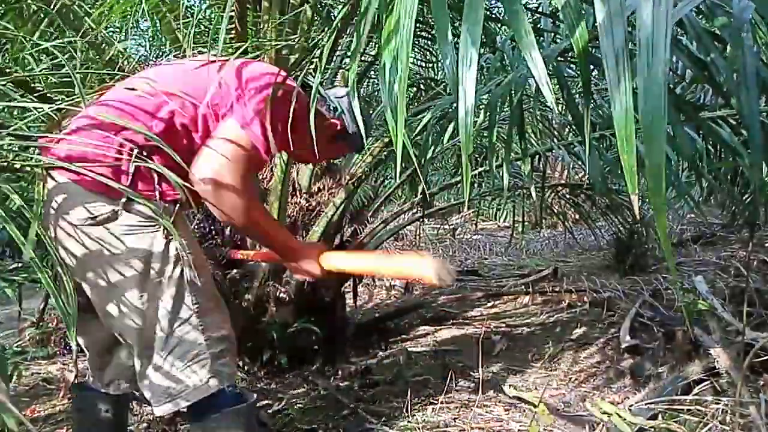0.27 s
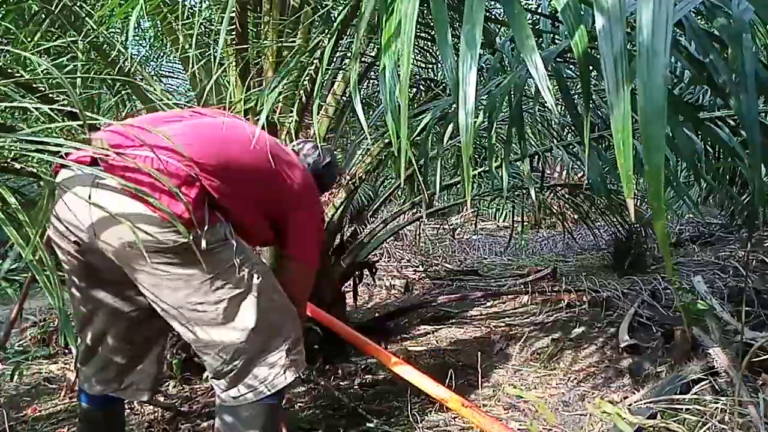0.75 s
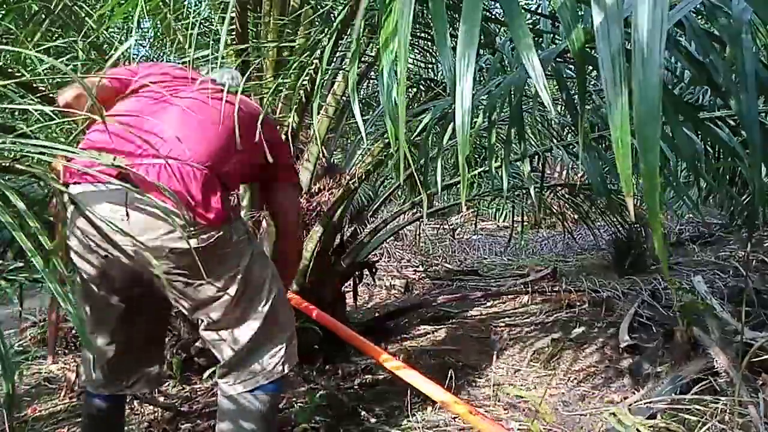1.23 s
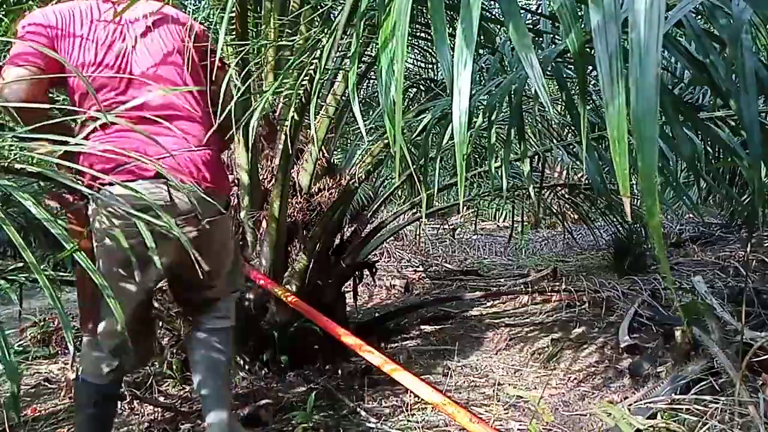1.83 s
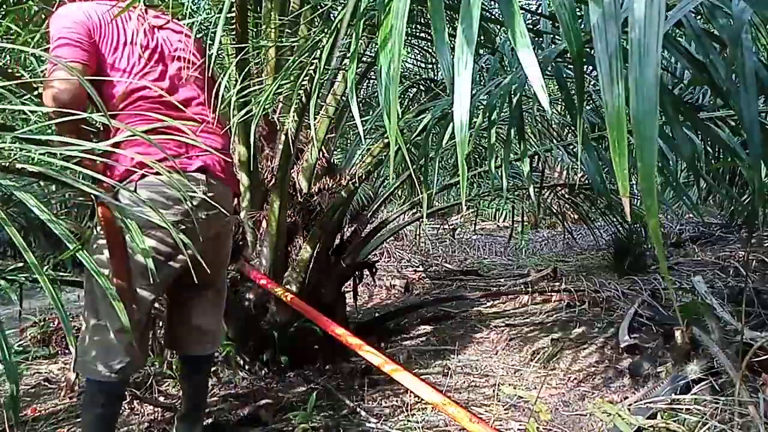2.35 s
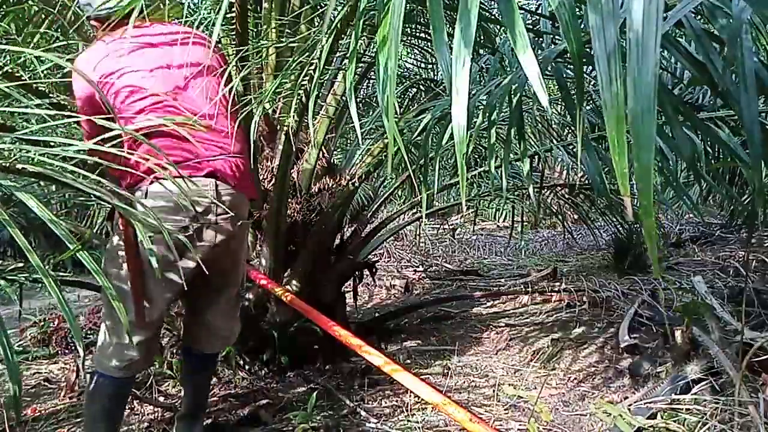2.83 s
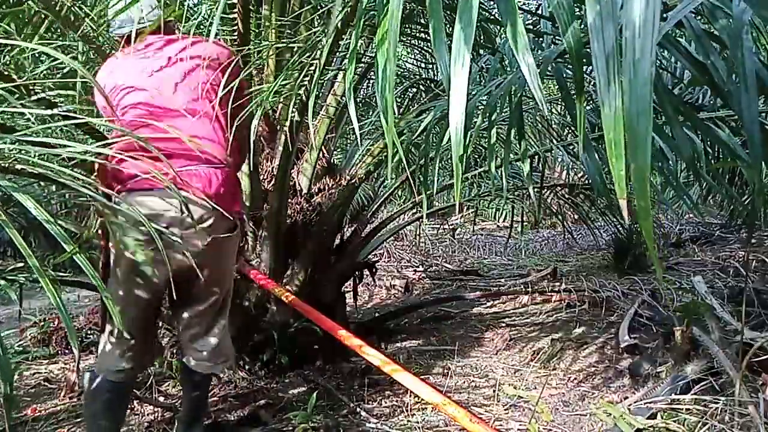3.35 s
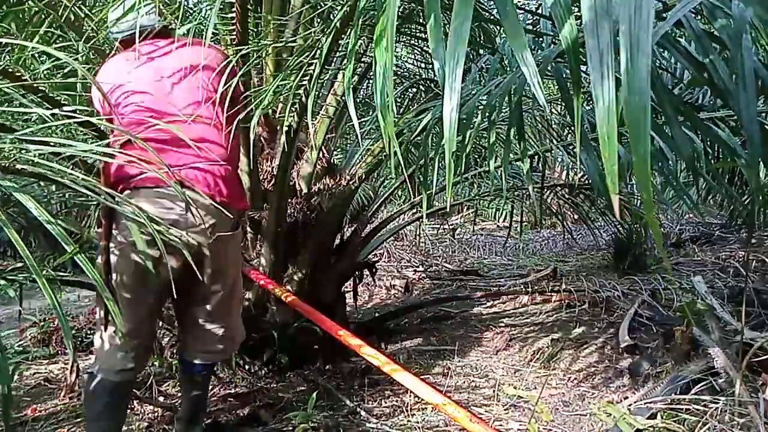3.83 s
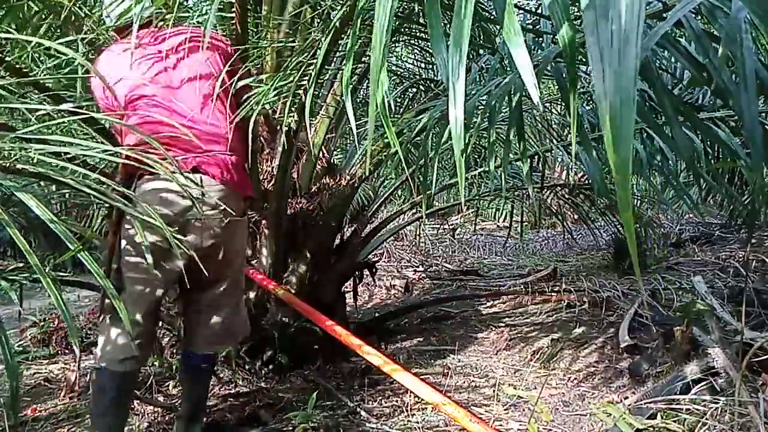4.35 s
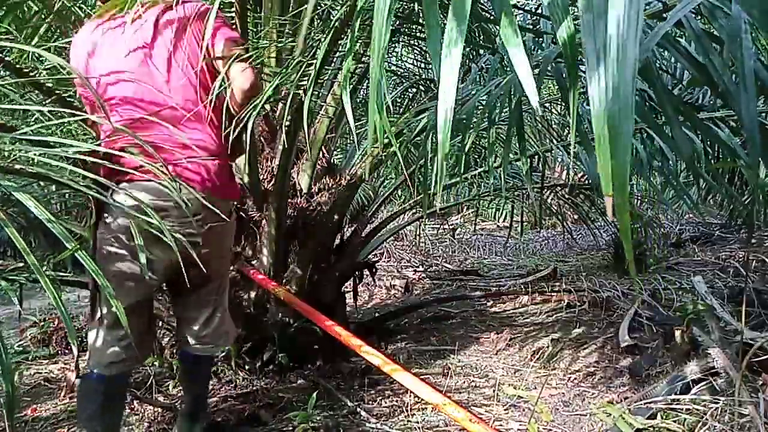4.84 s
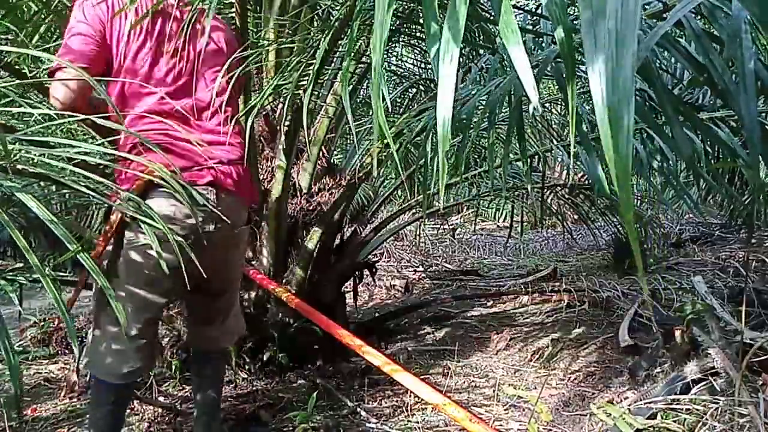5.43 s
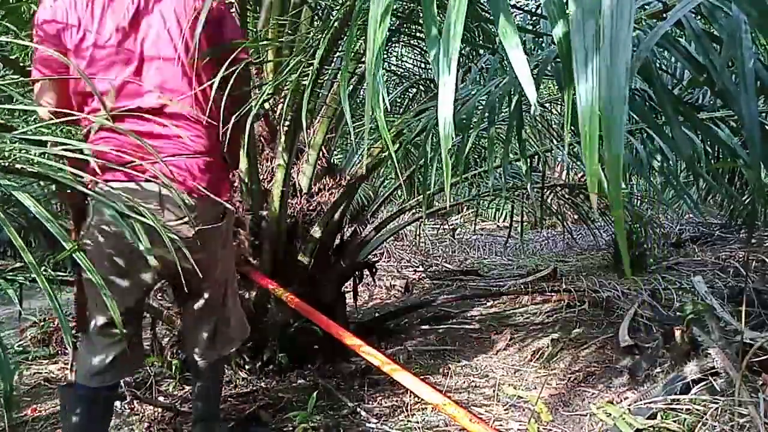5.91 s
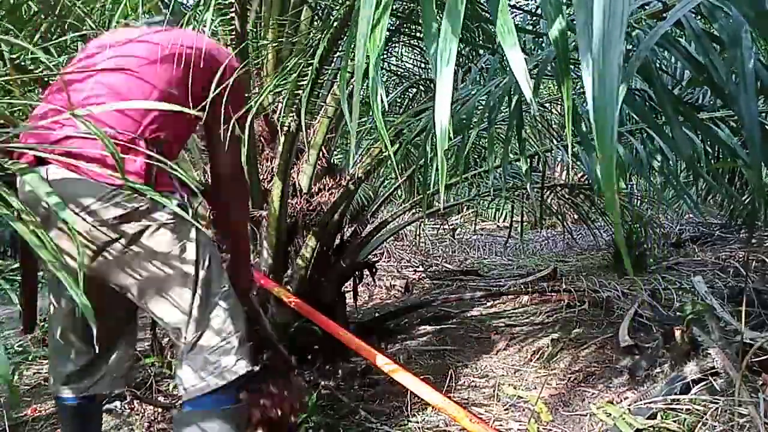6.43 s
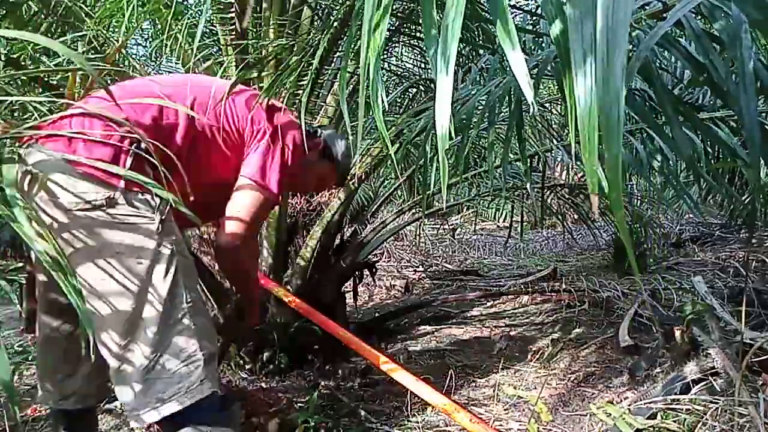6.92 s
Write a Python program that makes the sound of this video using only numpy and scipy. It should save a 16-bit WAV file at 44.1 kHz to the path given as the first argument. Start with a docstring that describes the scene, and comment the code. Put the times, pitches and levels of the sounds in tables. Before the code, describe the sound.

Outdoors in a palm plantation, insects shimmer over a soft low breeze. A long metal pole is dropped with dull thuds and short ringing tones, then leaves rustle underfoot. A sharp chop bites a stalk, followed by splitting cracks and bursts of frond rustling. A lighter chop, a faint pole knock and another strong chop come next, before the frond tears and falls in a wide swish. A nearby microphone catches the blows with diffuse leafy echoes.

```python
"""In a breezy palm grove full of insects, a worker drops a long metal pole, heard as a few ringing tones.
Leaves crackle and twigs tick (tiny noise bursts); boots thud softly on the litter (narrow bands of noise).
A chisel chops at a frond stalk: noise for the bursting wet fibres, fading tones for the shaft.
The stalk splits with sharp cracks, and more chops follow with another knock of the pole.
The frond tears off and crashes down in a wide swish; the foliage scatters every blow into a noisy echo."""
import sys
import numpy as np
from scipy import signal
from scipy.fft import rfft, irfft
from scipy.io import wavfile

SR = 44100
rng = np.random.default_rng(int(sys.argv[2]) if len(sys.argv) > 2 else 0)


def master(y):
    """Save y as 16-bit WAV."""
    cut = np.clip(np.atleast_2d(y).T, -1, 1)
    pcm = np.round(cut * 32767)  # scale
    wavfile.write(sys.argv[1], SR, pcm.astype(np.int16))


N = 316441
TIME = np.arange(N) / SR  # seconds from the start of the scene
SINCE = TIME[:SR // 2]  # seconds from the start of one event

# shared tone colour, falling above 4.5 kHz with a small bump near 7 kHz: pitch_hz [Hz], level_db [dB per Hz,
# relative]
SHARED_SPECTRUM = [(60, -4), (120, -5.5), (300, -2.5), (700, -1), (1500, 2), (3700, 3.5), (4600, -6),
                   (5500, -16), (7100, -13.5), (9800, -29.5), (12000, -29), (15500, -27)]


def from_db(db):
    """Turn decibels into a gain."""
    return 10 ** (np.asarray(db) / 20)


def rms_one(x):
    """Scale a sound to an average power of 1."""
    return x / np.sqrt(np.mean(x ** 2) + 1e-20)


def in_time(rows):
    """Draw straight lines between the rows of a curve, to get each column at every sample."""
    s, *columns = np.transpose(rows)
    return [np.interp(TIME, s, column) for column in columns]


def add(track, s, sound):
    """Mix a sound into a track at time s."""
    at = max(round(s * SR), 0)
    track[at:at + len(sound)] += sound[:N - at]


def band(x, low_hz, high_hz, order=2):
    """Keep the pitches between two limits, working forward in time only."""
    limits = [low_hz, min(high_hz, SR / 2 - 100)]
    sos = signal.butter(order, limits, "band", fs=SR, output="sos")
    return signal.sosfilt(sos, x + 1e-18)


def colour(x, spectrum, size=4096):
    """Give a sound the spectrum's tone with an early (minimum-phase) response; white noise keeps its power."""
    hz, db = np.transpose(spectrum)
    grid = np.linspace(1, SR / 2, size // 2 + 1)
    gain = from_db(np.interp(np.log(grid), np.log(hz), db))
    # folding the cepstrum forward puts the response as early as possible
    cepstrum = irfft(np.log(gain))
    cepstrum[1:size // 2] *= 2
    cepstrum[size // 2 + 1:] = 0
    response = irfft(np.exp(rfft(cepstrum)))
    return signal.fftconvolve(x, response / np.linalg.norm(response))[:len(x)]


def drift(rate):
    """Wander at random: `rate` new values a second, of spread 1, joined by straight lines."""
    knots = rng.standard_normal(4000)
    return np.interp(TIME * rate, np.arange(len(knots)), knots)


def dying(t60):
    """Fade from 1, losing 60 dB every t60 seconds."""
    return from_db(-60 * SINCE / max(t60, 1e-3))


def burst(envelope, low_hz, high_hz):
    """Make a swarm of tiny fractures: noise in one band, with the energy of its envelope."""
    swarm = band(rng.standard_normal(len(envelope)) * envelope, low_hz, high_hz, order=3)
    return swarm * np.linalg.norm(envelope) / np.linalg.norm(swarm)


def ring(modes):
    """Ring struck metal: each mode is a fading sine that starts upward or downward at random."""
    total = 0
    for hz, db, t60 in modes:
        tone = np.sin(2 * np.pi * hz * SINCE) * dying(t60)
        total = total + from_db(db) * rng.choice([-1, 1]) * tone
    return total


def grove(air_db=-61.5, waver_db=2.0, rumble_db=-64.5, gust_db=0.5, gusts_per_s=6):
    """Far leaves and insects are filtered noise; the breeze is a nearly steady low rumble."""
    # tone colour of far leaves: pitch_hz [Hz], level_db [dB per Hz, relative]
    air_spectrum = [(30, -16), (65, -2.5), (130, 0.5), (210, -19.5), (300, -19.5), (950, -12), (1500, 0),
                    (3200, 1), (4400, -12.5), (5400, -22.5), (7500, -31), (9500, -36), (15500, -38)]
    # insect chorus: pitch_hz [Hz], width_hz [Hz], level_db [dB, before wavering]
    insect_bands = [(3110, 39, -77.5), (6330, 530, -80), (7340, 300, -100.5), (7280, 280, -80.5)]
    air = from_db(air_db) * colour(rng.standard_normal(N), air_spectrum)
    hiss = rng.standard_normal(N)
    insects = 0
    for hz, width, db in insect_bands:
        song = rms_one(band(hiss, hz - width / 2, hz + width / 2))
        insects = insects + from_db(db + waver_db * drift(25)) * song
    gusts = from_db(rumble_db + gust_db * drift(gusts_per_s))
    rumble = gusts * rms_one(band(hiss, 83.0, 188.7, order=3))
    return air + insects + rumble


def foliage_motion(edge_db=-20):
    """Find leaflet and stalk levels in dB: each swish swells and settles on top of the steady stirring."""
    # the worker shifts, stands still, then works the stalk: start_s [s], leaflet_db [dB], stalk_db [dB]
    stirring = [(0, -58.5, -69.5), (.35, -56, -61), (.8, -55, -66), (1.2, -58, -81), (1.95, -64, -76.5),
                (3.05, -65.5, -72), (3.45, -55.5, -59.5), (5.03, -54, -55.5), (5.25, -61.5, -63.5),
                (6.3, -54, -62), (7.18, -58, -65.5)]
    # a frond is pushed, torn or dropped, or shivers after a chop:
    # peak_s [s], leaflet_db [dB], stalk_share_db [dB from leaflets], rise_s [s], fall_s [s]
    swishes = [(0.521, -42.5, -2, 0.047, 0.18), (1.45, -52.5, -1, 0.18, 0.21),
               (1.75, -60, -6.5, 0.18, 0.078), (2.56, -59, 5, 0.17, 0.34), (3.267, -38, -3, 0.073, .11),
               (3.314, -41, -9, .06, 0.038), (3.97, -36, -3.5, 0.057, 0.09), (4.044, -38.5, -2, 0.058, 0.2),
               (4.214, -43.5, -4, .02, 0.069), (4.629, -44.5, -3.5, 0.039, 0.075),
               (4.81, -53, 3, 0.14, 0.14), (5.49, -50.5, -0.5, .12, 0.36), (5.76, -40, -1.5, 0.13, 0.29),
               (5.991, -38.5, 4, 0.032, 0.19), (6.125, -33, -4.5, 0.17, 0.24), (6.492, -44, -3, 0.22, 0.14)]
    leaflets, stalks = from_db(in_time(stirring)) ** 2
    for s, db, stalk_share_db, rise_s, fall_s in swishes:
        # a swish is edge_db from its peak one rise time before it and one fall time after it
        before, after = (s - TIME) / max(rise_s, .01), (TIME - s) / max(fall_s, .01)
        swish_db = db + edge_db * np.maximum(before, after)
        power = from_db(np.maximum(swish_db, -150)) ** 2
        leaflets = leaflets + power
        stalks = stalks + power * from_db(stalk_share_db) ** 2
    return 10 * np.log10(leaflets), 10 * np.log10(stalks)


def crackle(per_s, size_db, hiss):
    """Mix small snaps of uneven size with the hiss of sliding leaves; the rate leaves the power alone."""
    born = rng.random(N) < per_s / SR
    sizes = from_db(size_db * np.minimum(rng.exponential(1, N), 3.5)) * rng.choice([-1, 1], N)
    snaps = rms_one(born * sizes / np.sqrt(per_s))
    return rms_one(snaps + hiss * rng.standard_normal(N))


def ticks(per_s, size_db=4, width_ratio=1.16):
    """Flick single leaflets: each click goes through one of ten narrow bands, picked at random."""
    sizes = from_db(size_db * np.minimum(rng.exponential(1, N), 2)) * rng.choice([-1, 1], N)
    snaps = sizes * (rng.random(N) < per_s / SR) / np.sqrt(per_s)
    pitches = np.geomspace(900, 3300, num=10)  # Hz
    dealt = rng.integers(0, len(pitches), N)
    flicks = 0
    for k, hz in enumerate(pitches):
        flicks = flicks + band(snaps * (dealt == k), hz / width_ratio, hz * width_ratio, order=3)
    return rms_one(colour(flicks, SHARED_SPECTRUM))


def rustle(leaflet_db=-1, stalk_db=0, drag_db=-20, split_hz=1100, flutter_db=1.16, sway_db=2.0):
    """Harder motion crackles more densely; leaflets sound high, stalks sound low and drag on the soil."""
    leaflets, stalks = foliage_motion()
    effort = from_db((leaflets + 50) * .5)  # 1 when the leaflets are at -50 dB
    leaf_noise = colour(crackle(900 * effort, size_db=0.5, hiss=1.0), SHARED_SPECTRUM)
    top = rms_one(band(leaf_noise, split_hz, 16000))
    top = top + from_db(-7) * np.minimum(effort, 1) * ticks(160 * effort)
    stalk_noise = colour(crackle(600 * effort, size_db=1.5, hiss=0.84), SHARED_SPECTRUM)
    bottom = rms_one(band(stalk_noise, 100, split_hz))
    bottom = bottom + from_db(drag_db) * rms_one(band(rng.standard_normal(N), 28, 120))
    top = from_db(leaflets + leaflet_db + flutter_db * drift(150)) * top
    bottom = from_db(stalks + stalk_db + flutter_db * drift(100)) * bottom
    return from_db(sway_db * drift(25)) * (top + bottom)


def twigs(per_s=30, twig_db=3, spread_db=1, t60_cycles=68, low_hz=449, high_hz=3800, width_ratio=1.12):
    """Tick small twigs and stems at random times and pitches, louder where stalks or leaflets move."""
    out = np.zeros(N)
    leaflets, stalks = foliage_motion()
    for when, pitch, size in rng.random((int(per_s * N / SR), 3)):
        hz = low_hz * (high_hz / low_hz) ** pitch
        at = int(when * N)
        # low twigs follow the stalks, high ones the leaflets
        around_db = pitch * leaflets[at] + (1 - pitch) * stalks[at]
        db = twig_db + around_db + spread_db * (2 * size - 1)
        fade = dying(t60_cycles / hz)[:SR // 10]  # stops at 0.1 s
        add(out, at / SR, from_db(db) * burst(fade, hz / width_ratio, hz * width_ratio))
    return out


def thuds(rise_cycles=1.39, t60_cycles=15.8):
    """Soft ground and stalks under a weight or a blow: short narrow-band bumps, longer when low."""
    # footfalls, dull knocks, and the stalk's hollow knock under two chops:
    # start_s [s], level_db [dB], pitch_hz [Hz]
    bumps = [(.361, -31, 346), (.486, -18.5, 221), (1.327, -38, 126), (2.236, -33.5, 680),
             (2.563, -33, 684), (3.259, -28, 330), (3.936, -21, 237), (3.984, -24, 270),
             (4.6385, -32, 1330), (5.149, -31, 550), (5.1596, -25.5, 485), (5.3479, -13, 1540),
             (5.689, -30.5, 420), (5.726, -31, 259), (5.974, -25.5, 159), (6.422, -38, 144)]
    out = np.zeros(N)
    for s, db, hz in bumps:
        bump = dying(t60_cycles / hz) * (1 - np.exp(-SINCE * hz / rise_cycles))
        add(out, s, from_db(db) * burst(bump, hz * 0.67, hz * 1.394))
    return out


def pole():
    """Knock or drop the metal tube: each contact wakes its modes most strongly near a favoured pitch."""
    # contacts: start_s [s], level_db [dB], favoured_hz [Hz], spread_octaves [octaves]
    contacts = [(.274, -42.5, 3380, 0.23), (.364, -42.5, 1620, 0.78), (.490, -39.5, 700, 1.6),
                (.504, -35, 540, 0.5), (1.165, -51, 1290, 0.042), (4.953, -36, 1230, 0.11)]
    # tones of the tube: pitch_hz [Hz], level_db [dB, before the contact's weighting], t60_s [s to lose 60 dB]
    tube_modes = [(371, -1, .55), (581, 3, .26), (1631, 1, .22), (1287, -4, .28), (528, -6, .3),
                  (795, -4, .22), (991, -7, .28), (1125, -13, .3), (1986, -10, .3), (2230, -8, .27),
                  (2934, -13, .3), (3440, -2, .11), (3725, -13, .3)]
    out = np.zeros(N)
    for s, db, centre_hz, spread in contacts:
        modes = []
        for hz, level, t60 in tube_modes:
            distance = np.log2(hz / centre_hz) / spread
            modes.append((hz, level - 10 * np.log10(1 + distance ** 2), t60))
        add(out, s, from_db(db) * ring(modes))
    return out


def cracks(snap_t60=0.0091, fizz_db=-22, rise_s=.0006):
    """Break stalks and twigs: a sharp snap together with hollow body and splinters that die away."""
    # breaks: start_s [s], level_db [dB], dryness [0 green to 1 dry], t60_s [s to lose 60 dB]
    breaks = [(0.192, -46, 0.4, 0.063), (.315, -46, 1, 0.058), (.363, -46, 0.73, .047),
              (0.489, -29, 0.5, 0.068), (0.594, -39.5, 0.7, 0.06), (0.969, -45, 0.84, 0.074),
              (1.412, -44, 0.76, 0.038), (1.469, -31.5, 0.4, 0.0072), (1.667, -50.5, 1, 0.026),
              (2.062, -50.5, 0.27, 0.18), (2.238, -52, .2, 0.096), (2.886, -47, 0.45, 0.2),
              (3.12, -48, 0.35, 0.12), (3.208, -39, 0, 0.04), (3.237, -37, .4, 0.045),
              (3.257, -31.5, 0.74, 0.024), (3.461, -45, 0.5, 0.12), (3.512, -45, 0.8, 0.047),
              (3.605, -42, 0.5, 0.032), (3.778, -44.5, 0, 0.073), (3.898, -38, 0.78, 0.037),
              (3.939, -26.5, 0.74, 0.036), (3.9615, -19.5, 0.7, 0.0074), (4.020, -23, 0.55, 0.018),
              (4.206, -37, 0.92, 0.018), (5.1604, -36.5, 0, 0.013), (5.442, -38.5, 0.87, 0.025),
              (5.664, -33.5, 1, .02), (5.690, -34.5, 0.2, 0.025), (5.726, -33, 0.5, 0.037),
              (5.743, -36, 1, 0.07), (5.96, -24, 0.36, 0.046), (6.491, -34.5, 0.92, 0.061)]
    # loud cracks come from thick stalks: body share at thick_db, and its growth per dB of level
    thick_db, thick_body_db, body_per_db = -24.5, 1, .5
    # dry wood splinters and snaps, green wood knocks: changes from green to dry, and snap when half dry
    dry_tilt_db, dry_snap_db, half_dry_snap_db = 8, 33, -6.5
    out, snaps = np.zeros(N), np.zeros(N)
    for s, db, dryness, t60 in breaks:
        dry = dryness - .5
        body_db = db + thick_body_db + body_per_db * (db - thick_db)
        middle_db, splinter_db = db - dry_tilt_db * dry, db + dry_tilt_db * dry
        snap_db = db + half_dry_snap_db + dry_snap_db * dry
        fade = (dying(t60) * (1 - np.exp(-SINCE / rise_s)))[:SR // 10]  # stops at 0.1 s
        body = from_db(body_db) * burst(fade, 230, 924)
        middle = from_db(middle_db) * burst(fade, 1030, 2320)
        chips = band(burst(fade, 1520, 4530), 1600, 4020, order=4)
        chips = chips + from_db(fizz_db) * burst(fade, 4700, 8100)
        add(out, s, body + middle + from_db(splinter_db) * chips)
        snap = burst(dying(snap_t60)[:SR // 10], 1800, 20600)
        add(snaps, s + rise_s, from_db(snap_db) * snap)
    return out + colour(snaps, SHARED_SPECTRUM)


def chops(stop_t60=0.04, crunch_db=-10, crunch_t60=0.16, crunch_hz=2000):
    """Fibres burst while the blade travels; it sticks, the shaft rings and the stalk crunches around it."""
    # blade into stalk: start_s [s], cut_db [dB, before colouring], shaft_db [dB], bite_s [s],
    # cut_length_s [s], middle_share_db [dB from the cut], splinter_share_db [dB from the cut]
    blade_blows = [(2.4284, -15, -26.5, 0.0015, 0.0075, -4.5, -7.5),
                   (4.6365, -25.5, -39.5, 0.00067, 0.0022, 5.5, -4),
                   (5.3441, -15, -22.5, 0.0081, .0075, 0.5, -6.5)]
    # tones of the chisel shaft: pitch_hz [Hz], level_db [dB, relative], t60_s [s to lose 60 dB]
    shaft_modes = [(219, 0, .28), (649, -4, .16), (255, -5, .09), (150, -6, .06), (555, -9, .06),
                   (885, -13, .06), (1590, -10, .06), (2375, -10, .13), (2465, -8, .16), (2680, -15, .16),
                   (2860, -16, .14), (3420, -13, .17), (3750, -17, .12)]
    # tone colour of cut fibres: pitch_hz [Hz], level_db [dB per Hz, relative]
    cut_spectrum = [(60, -36), (110, -1), (300, -5.5), (550, 3.5), (800, 0.5), (1400, 5), (1900, 2),
                    (2500, 7), (3600, 1), (4500, -4), (5600, -17.5), (7100, -16.5), (9500, -31.5),
                    (15500, -36)]
    cuts, rings = np.zeros(N), np.zeros(N)
    edges = [70, 180, 380, 700, 1100, 1700, 2600, 4000, 16000]  # Hz
    for s, db, shaft_db, bite_s, length, middle_db, splinter_db in blade_blows:
        bite = np.minimum(SINCE / bite_s, 1)
        travel = bite * from_db(-60 * np.maximum(SINCE - length, 0) / stop_t60)
        # where the blade enters decides how hollow and how splintery the blow sounds
        shares = [0, 0, 0, middle_db, middle_db, splinter_db, splinter_db, splinter_db]
        for low, high, share_db in zip(edges, edges[1:], shares):
            gain = from_db(db + share_db) * np.sqrt((high - low) / edges[-1])
            add(cuts, s, gain * burst(travel, low, high))
        crunch = burst(bite * dying(crunch_t60), crunch_hz, 13600)
        add(cuts, s, from_db(db + crunch_db) * crunch)
        add(rings, s + length / 2, from_db(shaft_db) * ring(shaft_modes) * bite)
    return colour(cuts, cut_spectrum) + rings


def scatter(x, near_db=-15, near_t60=0.19, far_db=-21, far_t60=0.83, treble_db=1.5):
    """Countless fronds break each blow's echo into smooth noise: a near wash and a far one."""
    wash = 0
    for db, t60, build_s in [(near_db, near_t60, .008), (far_db, far_t60, .04)]:
        tail = dying(t60) * (1 - np.exp(-SINCE / build_s))
        wash = wash + (from_db(db) * tail / np.linalg.norm(tail)) ** 2
    noise = colour(rng.standard_normal(N), SHARED_SPECTRUM)
    out, edges = 0, [300, 750, 1900, 4800, 16000]  # Hz
    for k, (low, high) in enumerate(zip(edges, edges[1:])):
        # the energy in each band lingers and comes back as leaf noise
        power = np.abs(signal.oaconvolve(band(x, low, high, order=4) ** 2, wash)[:N])
        leaf_noise = rms_one(band(noise, low, high, order=4))
        # each higher band is favoured by treble_db more
        out = out + from_db(treble_db * (k - 3.5)) * np.sqrt(power) * leaf_noise
    return out


def scene():
    """Mix the work, its echoes and the grove around it."""
    background = grove() + rustle() + twigs()
    blows = thuds() + pole() + cracks() + chops()
    return (background + blows + scatter(blows))[None]


def record(dry):
    """The microphone sheds the bass below about 45 Hz; the top is cut above 15700 Hz."""
    thin = signal.sosfilt(signal.butter(2, 45, "high", fs=SR, output="sos"), dry)
    return signal.sosfilt(signal.ellip(10, .2, 70, 15700, fs=SR, output="sos"), thin)


dry = scene()
out = record(dry)
master(out)
```